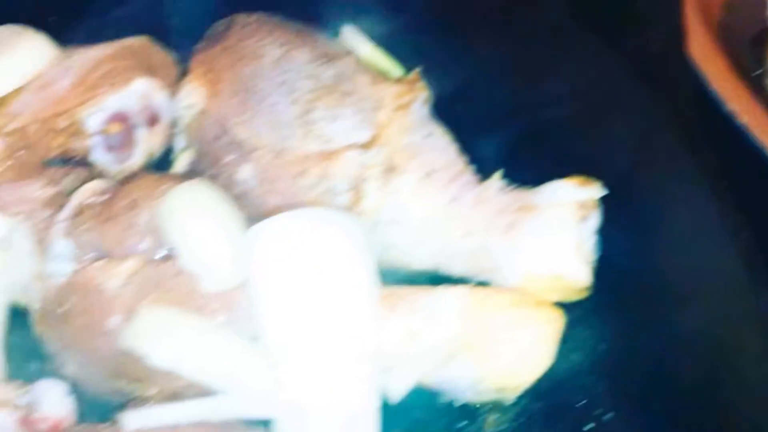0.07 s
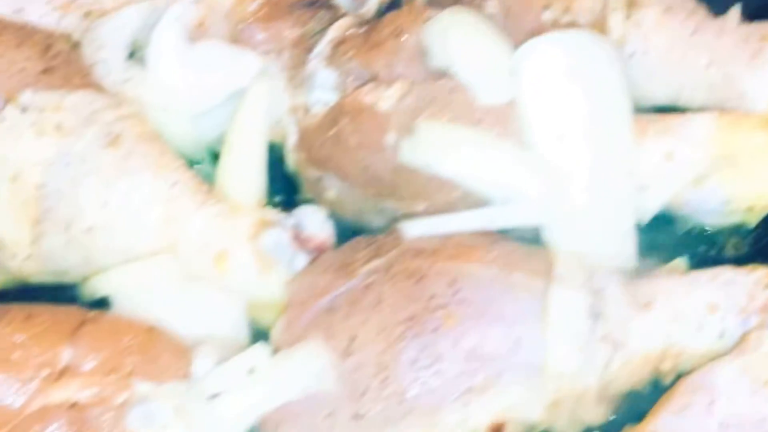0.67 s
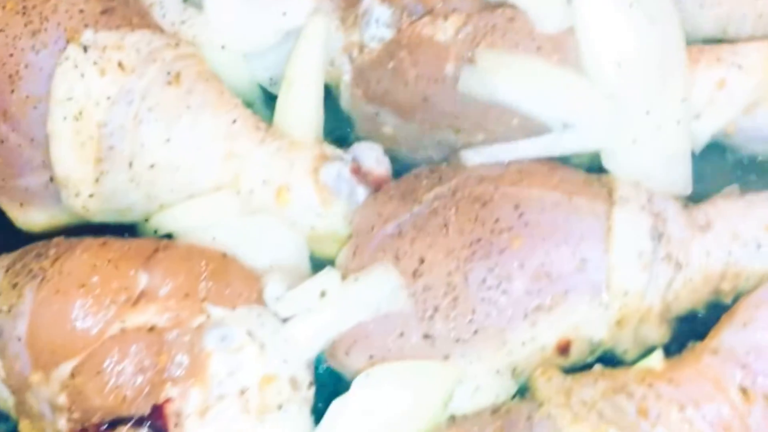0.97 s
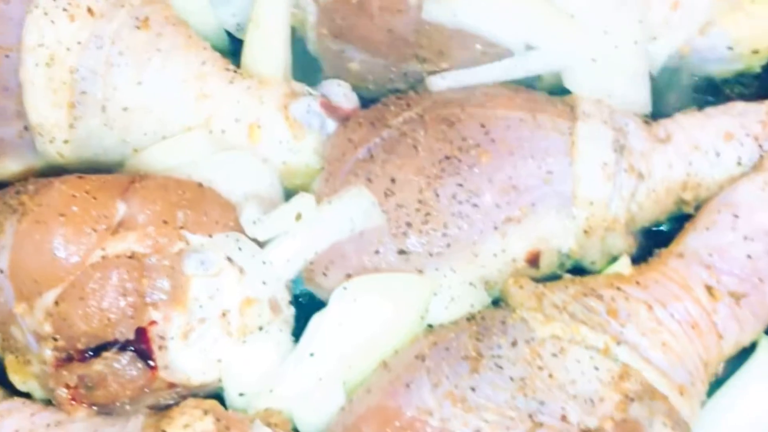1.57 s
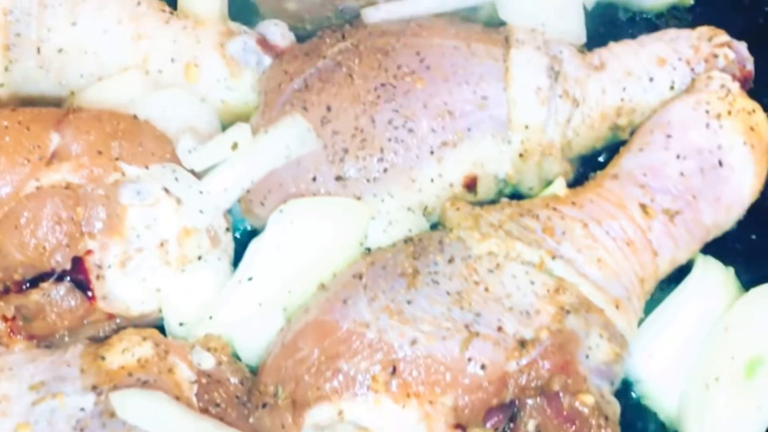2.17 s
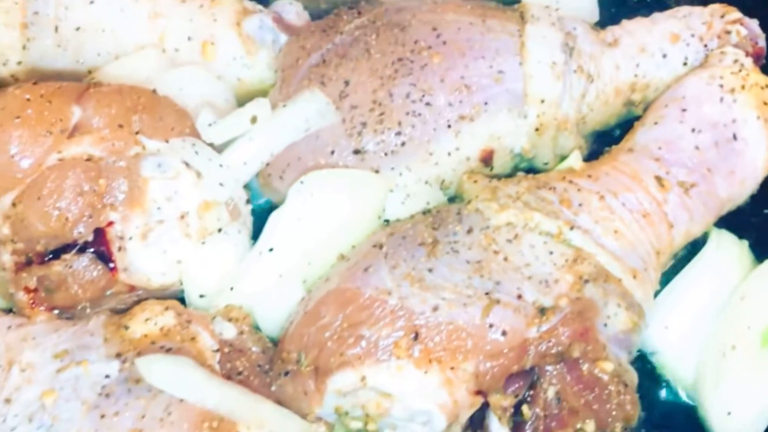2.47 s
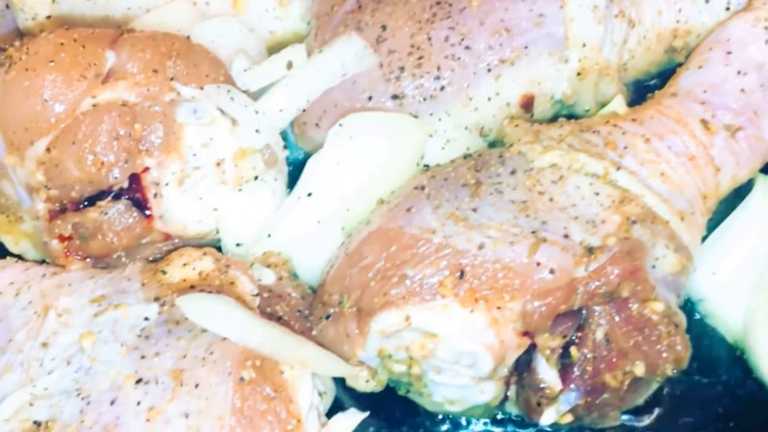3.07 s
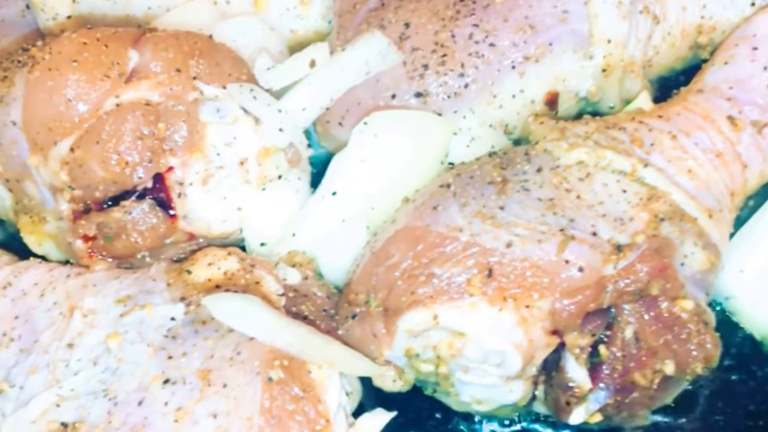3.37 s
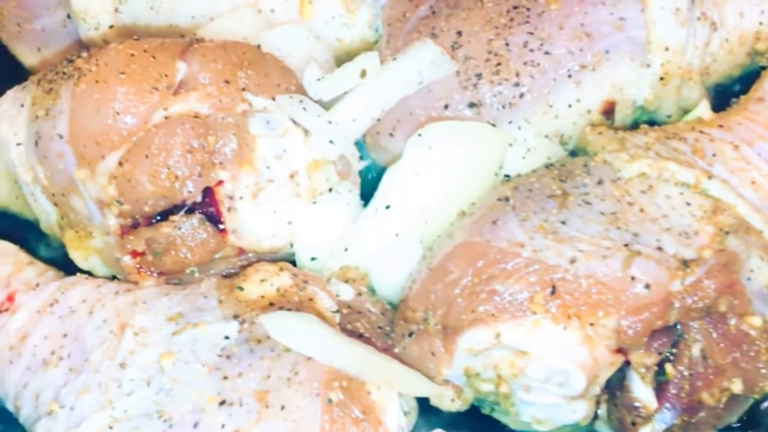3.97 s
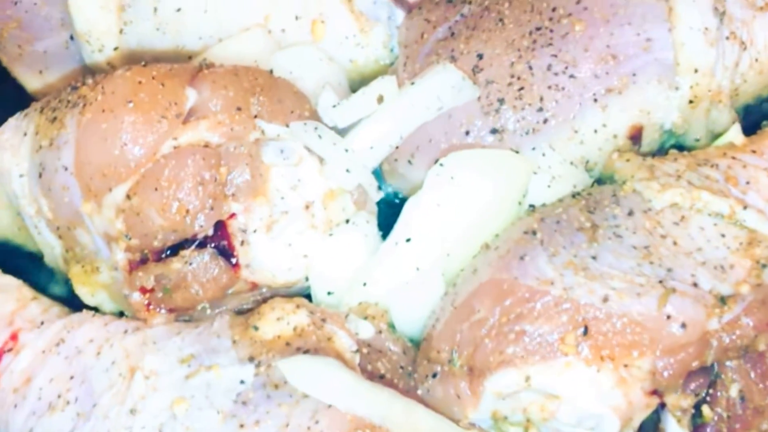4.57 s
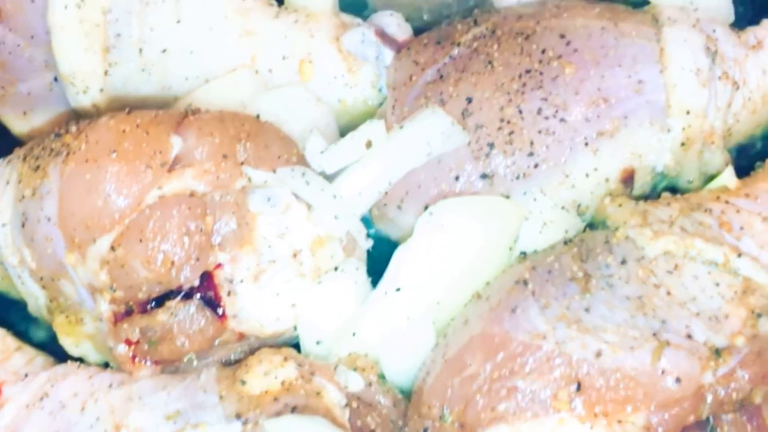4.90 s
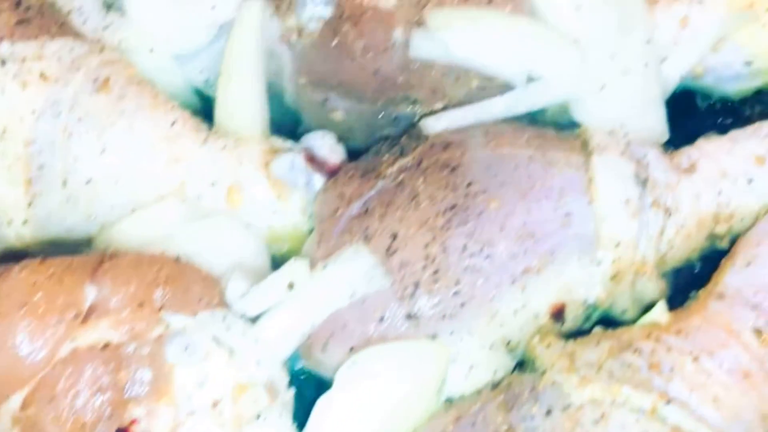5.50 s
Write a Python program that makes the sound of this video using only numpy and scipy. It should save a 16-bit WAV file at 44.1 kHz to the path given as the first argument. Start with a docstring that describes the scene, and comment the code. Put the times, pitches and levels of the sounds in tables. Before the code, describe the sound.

Close, bright frying of chicken and onions, hissing and crackling evenly with scattered pops and snaps of fat.

```python
"""Chicken and onions sizzle in a hot pan, close up in a quiet kitchen.
Countless tiny steam bubbles merge into a hiss; nearer ones crackle and ring, and a few pop loudly.
Fat snaps, steam trapped under the meat escapes in short spurts, droplets flash into spray
and slow bubbles blip in the juices. Room rumble and a mains hum lie faintly underneath."""
import sys
import numpy as np
from scipy import signal
from scipy.fft import rfft, irfft
from scipy.io import wavfile

SR = 44100
rng = np.random.default_rng(int(sys.argv[2]) if len(sys.argv) > 2 else 0)


def log_audio(samples):
    """Write samples as a 16-bit WAV file to the path given in sys.argv[1]."""
    # one column per channel
    frames = np.atleast_2d(samples).T
    # limit to full scale, then quantise
    limited = np.clip(frames, -1, 1)
    pcm = np.round(limited * 32767).astype(np.int16)
    wavfile.write(sys.argv[1], SR, pcm)


N = 244314
TIME = np.arange(N) / SR
FREQS = np.fft.rfftfreq(N, 1 / SR)


def hiss(flutter_db=0.9):
    """Bubbles too small and too many to tell apart: the bed of the sizzle."""
    return unit_rms(rng.standard_normal(N) * gain_of(flutter_db * wander(rate_hz=25)))


def crackle():
    """Oil films snap: dry ticks with hardly any pitch."""
    return bubble_cloud(base_per_s=90, ring_cycles=1.32, rise_cycles=0.6, spread_db=3.0, clump=0.5,
                        low_hz=653, high_hz=17400, sizes=14)


def bubbling():
    """Wet cavities between the pieces ring in clumps; a few near ones sing on for some milliseconds."""
    fizz = bubble_cloud(base_per_s=75, ring_cycles=6.5, rise_cycles=2.6, spread_db=1.5, clump=0.9,
                        low_hz=810, high_hz=15350, sizes=30)
    plinks = bubble_cloud(base_per_s=7, ring_cycles=76, rise_cycles=5.1, spread_db=1.0, clump=1.05,
                          low_hz=857.6, high_hz=13970, sizes=72)
    return unit_rms(fizz + gain_of(-2.0) * plinks)


def bubble_cloud(base_per_s, ring_cycles, rise_cycles, spread_db, clump, low_hz, high_hz, sizes):
    """Bubbles of many sizes; each size bursts in its own fits and starts, small ones more often."""
    out = np.zeros(N)
    knots_s = np.arange(0, N / SR, 0.02)
    for step in (np.arange(sizes) + rng.uniform(0.25, 0.75, sizes)) / sizes:
        pitch_hz = low_hz * (high_hz / low_hz) ** step
        activity = np.interp(TIME, knots_s, np.exp(clump * rng.standard_normal(len(knots_s))))
        clicks = random_clicks(base_per_s * np.sqrt(pitch_hz / low_hz) * activity, spread_db)
        ringing = unit_rms(cavity(clicks, pitch_hz, ring_cycles, rise_cycles))
        out += np.sqrt(pitch_hz) * ringing  # small bubbles cover a wider band
    return unit_rms(out)


# Tone curve of the sizzle: freq_hz, gain_db
SIZZLE_EQ = [(150, -37), (480, -14), (750, -12.5), (1000, -11), (1500, -5), (2300, -0.45), (2900, 0.5),
             (4300, -1), (6300, 1.9), (8400, -3.5), (9800, -7.5), (12500, -9), (15800, -9)]
# The pan's resonances and the hollows between them: centre_hz, width_hz, gain_db
PAN_RESONANCES = [(965, 36, 1.5), (1320, 42, -2.5), (1630, 80, 0.5), (1840, 190, -1.5), (2350, 72, 0.6),
                  (2530, 66, -2), (2750, 220, 0.6), (3760, 120, -1), (4260, 640, 3), (4990, 175, -3),
                  (7660, 250, -2.5), (10490, 310, -5), (13800, 300, -0.5)]
# Slow drift as the microphone moves over the pan, before trims: time_s, low_db, middle_db, treble_db
SIZZLE_DRIFT = [(0.0, -36, -33.5, -34.5), (0.18, -36, -33, -35.5), (0.96, -36.5, -33.5, -36.5),
                (1.5, -36, -33, -36.5), (2.3, -36.5, -33.5, -37.5), (3.16, -37, -32.5, -36.5),
                (4.3, -36.5, -33.5, -38), (5.05, -36.5, -33, -37.5), (5.2, -36, -32.5, -36),
                (5.54, -36.5, -32.7, -36.5)]


def pan(frying, low_trim_db=-0.06, middle_trim_db=-0.26, treble_trim_db=-0.5, treble_waver_db=0.76):
    """The pan colours the frying; its lows, middle and top treble each drift in level."""
    resonance_db = sum(db * np.exp(-((FREQS - hz) / width) ** 2) for hz, width, db in PAN_RESONANCES)
    sizzle = equalise(frying, eq_curve(SIZZLE_EQ) + resonance_db)
    upper = highpass(sizzle, 3390, fade_hz=300)
    treble = highpass(sizzle, 7880, fade_hz=1000)
    time_s, *band_levels = np.transpose(SIZZLE_DRIFT)
    low_db, middle_db, treble_db = (np.interp(TIME, time_s, db) for db in band_levels)
    treble_db += treble_waver_db * wander(rate_hz=6.2)  # the top treble wavers slightly at random
    return (unit_rms(sizzle - upper) * gain_of(low_db + low_trim_db)
            + unit_rms(upper - treble) * gain_of(middle_db + middle_trim_db)
            + unit_rms(treble) * gain_of(treble_db + treble_trim_db))


# Single loud bubbles bursting: start_s, peak_db, pitch_hz
LOUD_POPS = [(.1724, -23, 4510), (.6171, -19.5, 4100), (1.0284, -21.5, 4210), (1.68, -23.5, 4120),
             (1.7964, -25.5, 2330), (2.4938, -21.5, 4600), (2.7786, -22, 4120), (3.37, -20, 4240),
             (3.4337, -25, 4390), (3.7354, -22.5, 4410), (3.9498, -20.5, 4220), (4.017, -24, 4100),
             (4.071, -24, 4350), (4.0988, -20, 4260), (4.1322, -24, 4030), (4.2135, -22, 4450),
             (4.6458, -19.5, 4270), (5.4926, -21, 4440)]


def pops():
    """A large bubble opens and its cavity rings briefly: a tight, pitched tick."""
    return bursts(LOUD_POPS + small_pops(), ring_cycles=5.2, rise_cycles=1.3)


def small_pops(per_s=14, peak_db=-27, spread_db=1.5, pitch_hz=4260, spread_octaves=0.14):
    """Lesser bubbles of much the same size burst at random; returns rows like LOUD_POPS."""
    rows = []
    for _ in range(round(per_s * N / SR)):
        start_s = rng.uniform(0, N / SR)
        db = peak_db + spread_db * rng.uniform(-1, 1)
        hz = pitch_hz * 2 ** (spread_octaves * rng.uniform(-1, 1))
        rows.append((start_s, db, hz))
    return rows


# Drops of fat snapping, before the bass cut: start_s, peak_db, brightness_hz
FAT_SNAPS = [(.3533, -22, 5200), (.6953, -19.5, 4000), (.8391, -21.5, 5400), (1.098, -22, 4700),
             (1.1154, -20, 9500), (1.7962, -22, 3600), (2.0348, -19.5, 5300), (2.133, -22, 5500),
             (2.4712, -20, 8500), (2.7787, -16.5, 7500), (2.9417, -20.5, 5000), (4.0988, -17, 4800),
             (4.1322, -14, 4600), (4.1442, -19, 5300), (4.3704, -21, 4200), (4.5187, -19.5, 4300),
             (4.8516, -20, 5800), (5.1826, -22, 5700), (5.1877, -15.5, 9300), (5.2154, -18.5, 6600),
             (5.2687, -21.5, 4700), (5.3185, -17.5, 3600)]


def snaps():
    """A skin of fat tears open: a bright click of one or two cycles."""
    clicks = bursts(FAT_SNAPS, ring_cycles=1.0, rise_cycles=0.15)
    return highpass(clicks, 1500, fade_hz=2400)  # the drops are too small to give any bass


# Steam sputtering out from under the meat: centre_s, level_db, pitch_hz
STEAM_SPURTS = [(.128, -37, 2150), (.237, -31.5, 2870), (.273, -32, 3960), (.555, -33.5, 2350),
                (.882, -32.5, 2330), (1.499, -31.5, 2370), (1.561, -32, 2310), (1.999, -34, 2480),
                (2.148, -29, 5290), (2.9095, -28, 3960), (4.226, -32, 6820), (4.261, -33.5, 2400),
                (5.526, -33, 2630)]


def spurts(length_cycles=47):
    """A puff of steam swells and fades in a narrow wet gap that gives it a fuzzy pitch."""
    out = np.zeros(N)
    from_centre_s = TIME[:SR // 10] - 0.05
    for centre_s, level_db, pitch_hz in STEAM_SPURTS:
        length_s = length_cycles / pitch_hz  # wider gaps sound lower and take longer to empty
        envelope = np.exp(-2 * (2 * from_centre_s / length_s) ** 2)
        noise = rng.standard_normal(len(envelope))
        steam = envelope * cavity(noise, pitch_hz, ring_cycles=12, rise_cycles=4)
        steam *= np.linalg.norm(envelope) / np.linalg.norm(steam)
        add(out, centre_s + from_centre_s[0], gain_of(level_db) * steam)
    return out


# Droplets hitting the hot oil: centre_s, level_db, length_s
DROPLET_FLARES = [(1.114, -29, .003), (2.077, -34.5, .08), (2.761, -36, .012), (2.79, -37, .022),
                  (2.958, -33, .004), (4.134, -34, 0.031), (5.188, -26, .002), (5.248, -33.5, .015)]


def flares():
    """A droplet flashes into fine spray with a short, bright hiss."""
    envelope = sum(gain_of(db) * swell(centre_s, length_s) for centre_s, db, length_s in DROPLET_FLARES)
    sizzle = equalise(rng.standard_normal(N), eq_curve(SIZZLE_EQ))
    return envelope * unit_rms(highpass(sizzle, 6600, fade_hz=2000))


# Big, slow bubbles in the juices under the meat: start_s, peak_db, pitch_hz
JUICE_BLIPS = [(.576, -50, 730), (1.308, -37, 1630), (2.214, -39, 1420), (2.636, -46, 905),
               (2.744, -42.5, 920), (3.396, -43, 1030), (5.127, -41, 1080), (5.250, -41, 1200)]


def blips():
    """A bubble wells up with a soft, low note; wet bubbles ring longer than dry ones."""
    return bursts(JUICE_BLIPS, ring_cycles=7.5, rise_cycles=1.5)


# Tone curve of the kitchen's rumble: freq_hz, gain_db
RUMBLE_EQ = [(10, -18), (25, -19), (37, 3), (50, -1), (75, 3), (110, 4.5), (180, 7), (270, 3), (340, 6),
             (450, -6), (900, -11.5), (3000, -32)]
# Soft swells of microphone handling noise: centre_s, boost_db, length_s
HANDLING_SWELLS = [(2.75, 3, 0.19), (3.68, 3.5, 0.32), (4.2, 2, 0.37)]


def rumble(base_db=-61):
    """Low room tone, with a few soft swells of microphone handling noise."""
    handling_db = sum(db * swell(centre_s, length_s) for centre_s, db, length_s in HANDLING_SWELLS)
    low_noise = unit_rms(equalise(rng.standard_normal(N), eq_curve(RUMBLE_EQ)))
    return gain_of(base_db + handling_db) * low_noise


# Mains hum and appliance motors: pitch_hz, rms_db, waver_db
HUM_TONES = [(59.4, -66, 1.3), (100, -70, 2.5), (118.9, -73, 2), (237, -72.5, 2.5), (328, -75, 3.5),
             (355.3, -70.5, 2.8)]


def hum():
    """The mains and the motors drone in faint pure tones, each wavering in level."""
    out = np.zeros(N)
    for pitch_hz, rms_db, waver_db in HUM_TONES:
        amplitude = np.sqrt(2) * gain_of(rms_db + waver_db * wander(rate_hz=6))
        out += amplitude * np.sin(2 * np.pi * (pitch_hz * TIME + rng.random()))
    return out


def bursts(rows, ring_cycles, rise_cycles):
    """One opened bubble per row: a sine that swells over rise_cycles and decays over ring_cycles."""
    out = np.zeros(N)
    for start_s, peak_db, pitch_hz in rows:
        cycles = pitch_hz * TIME[:SR // 20]
        envelope = (1 - np.exp(-cycles / rise_cycles)) * np.exp(-cycles / ring_cycles)
        tone = envelope * np.sin(2 * np.pi * cycles)
        add(out, start_s, gain_of(peak_db) * tone / abs(tone).max())
    return out


def cavity(x, pitch_hz, ring_cycles, rise_cycles):
    """A pocket of steam driven by x: one damped resonance sets the tail, a second softens the attack."""
    for cycles in (ring_cycles, rise_cycles):
        decay_s = max(cycles / np.pi / pitch_hz, 1 / SR)
        pole = np.exp((-1 / decay_s + 2j * np.pi * pitch_hz) / SR)
        x = signal.lfilter([1], [1, -pole], x).real
    return x


def random_clicks(per_s, spread_db, max_spreads=2.7):
    """Scattered clicks of either sign, mostly small, a few large."""
    clicks = np.zeros(N)
    draw = rng.random(N) * SR / per_s
    hits = np.flatnonzero(draw < 1)
    strength = np.minimum(-np.log(draw[hits] + 1e-12), max_spreads)
    clicks[hits] = (-1.0) ** hits * gain_of(spread_db * strength)
    return clicks


def wander(rate_hz):
    """Slow random modulation of rms 1, moving at up to about rate_hz."""
    spectrum = rfft(rng.standard_normal(N)) * (FREQS > 0)
    return unit_rms(irfft(spectrum / (1 + (FREQS / rate_hz) ** 4), N))


def swell(centre_s, length_s):
    """A bell-shaped envelope with peak 1."""
    return np.exp(-(2 * (TIME - centre_s) / length_s) ** 2)


def eq_curve(points):
    """A response in dB, joining the points on a log-frequency axis."""
    hz, db = np.transpose(points)
    return np.interp(np.log(FREQS + 1), np.log(hz + 1), db)


def equalise(x, response_db):
    """Minimum-phase EQ, so that clicks keep their sharp attack."""
    log_gain = np.log(gain_of(response_db))
    cepstrum = irfft(log_gain, N)
    phase = rfft(cepstrum * np.sign(N / 2 - np.arange(N))).imag
    return irfft(rfft(x) * np.exp(log_gain + 1j * phase), N)


def highpass(x, cutoff_hz, fade_hz):
    """The part of a sound above cutoff_hz, faded in over fade_hz."""
    return irfft(rfft(x) * np.clip((FREQS - cutoff_hz) / fade_hz + 0.5, 0, 1), N)


def gain_of(db):
    """Decibels to amplitude."""
    return 10 ** (np.asarray(db) / 20)


def unit_rms(x):
    """Scales to rms 1."""
    return x / np.sqrt(np.mean(x ** 2) + 1e-20)


def add(mix, start_s, sound):
    """Mixes a sound in at start_s."""
    part = mix[max(round(start_s * SR), 0):][:len(sound)]
    part += sound[:len(part)]


def scene():
    """The frying pan in its kitchen: close, dry and mono."""
    frying = gain_of(-7.0) * hiss() + gain_of(-5.0) * crackle() + gain_of(-5.0) * bubbling()
    spits = pops() + blips() + snaps() + spurts() + flares()
    return (pan(frying) + spits + rumble() + hum())[None]


def record(dry):
    """A steep low-pass takes off the very top of the treble."""
    cutoff_hz = 15740
    lowpass = signal.firwin(1023, cutoff_hz, window=("kaiser", 9), fs=SR)
    return signal.oaconvolve(dry, lowpass[None], "same")


dry = scene()
out = record(dry)
log_audio(out)
```